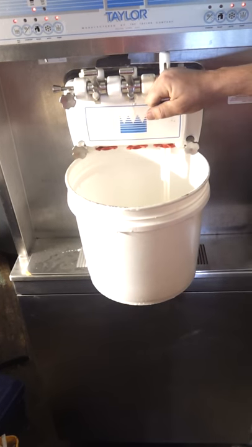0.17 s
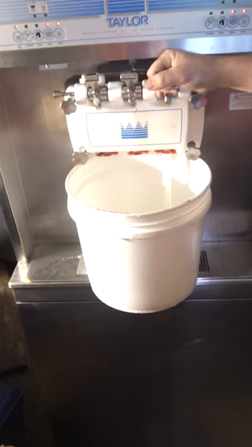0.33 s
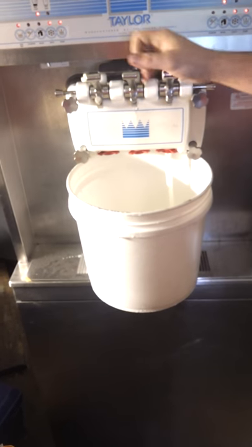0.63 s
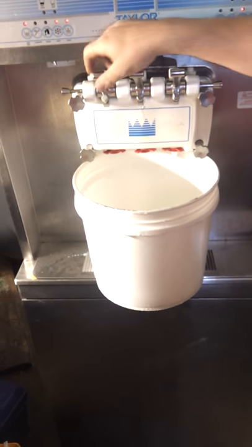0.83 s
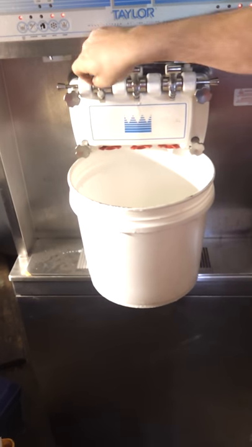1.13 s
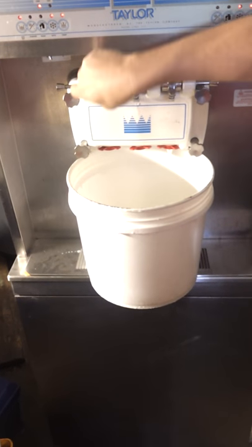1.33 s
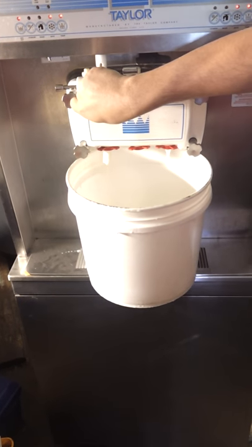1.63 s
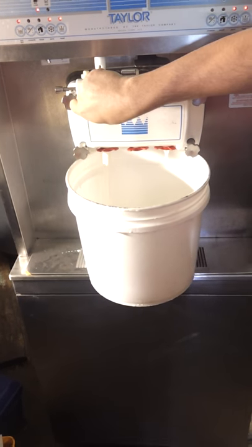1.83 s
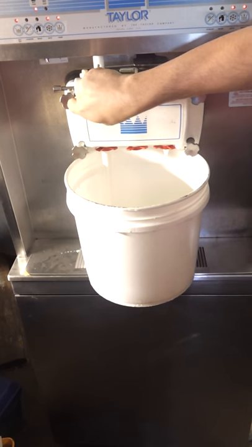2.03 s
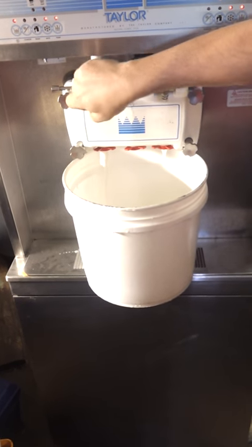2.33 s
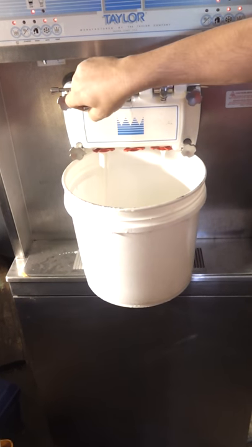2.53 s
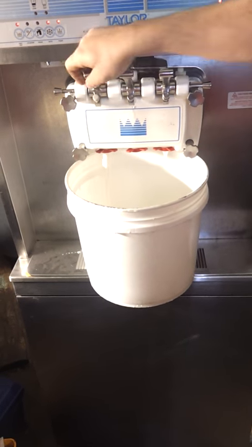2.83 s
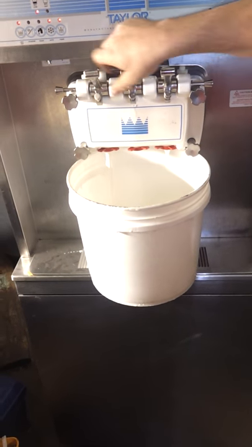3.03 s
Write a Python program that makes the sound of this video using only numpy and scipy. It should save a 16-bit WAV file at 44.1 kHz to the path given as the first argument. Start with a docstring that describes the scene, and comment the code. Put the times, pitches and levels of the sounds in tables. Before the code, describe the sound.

Soft-serve machine motor drone and fan roar, with sharp handle clacks and low cabinet thuds

```python
"""Frozen-dessert machine in a kitchen

A frozen-dessert machine runs in a hard-walled kitchen while a hand works its draw handles over a pail.
Bands of noise make the fan rumble, roar and hiss; sine waves make the mains hum, the whine and the motor.
Narrow noise makes brief hisses, low fading sines make the cabinet booms, and random clicks
ringing through resonances make the handle clacks."""
import sys
import numpy as np
from scipy import signal
from scipy.io import wavfile

SR = 44100
rng = np.random.default_rng(int(sys.argv[2]) if len(sys.argv) > 2 else 0)


def put_to_file(sound):
    """Save the sound as 16-bit audio at rate SR, in the file named by the first command-line argument."""
    columns = np.atleast_2d(sound).T  # one column per channel
    safe = np.clip(columns, -1, 1)
    whole_steps = np.round(safe * 32767)
    wavfile.write(sys.argv[1], SR, whole_steps.astype(np.int16))


N = 140679

# loudness of the fan noise over time:
# (time [s], rumble [dB], roar [dB], hiss [dB], top hiss [dB])
FAN_LEVELS = [(0.0, -34, -19.5, -28, -36), (0.22, -28.5, -23, -29, -37), (0.35, -31, -19.5, -27, -37),
              (0.59, -30.5, -22, -27.5, -37), (1.04, -31, -22.5, -27.5, -33.5), (1.52, -29, -21, -27, -34),
              (1.71, -21, -19.5, -25.5, -31), (1.9, -28, -19, -27, -34), (2.18, -25, -20.5, -26.5, -33.5),
              (2.51, -27.5, -19.5, -25.5, -34), (2.82, -24.5, -17, -25.5, -34), (3.02, -28, -19, -25, -34),
              (3.19, -20, -19.5, -27, -33.5)]
# pitches that part rumble, roar, hiss and top hiss: (frequency [Hz])
FAN_SPLITS_HZ = [90, 800, 7500]
# tone colour of the fan noise inside each group: (frequency [Hz], relative density [dB per Hz])
FAN_SPECTRUM = [(14, -35), (24, -7.5), (65, -5), (87, -12), (114, -1.5), (148, -2.5), (170, -3), (194, 0.5),
                (290, -4.5), (314, -4.5), (400, -5.5), (567, -11.5), (631, -14), (684, -16.5), (968, -25.5),
                (1140, -20), (1230, -23), (1570, -24.5), (2220, -29), (2410, -30), (7030, -31.5),
                (11100, -40.5), (14500, -48)]
FAN_PATCHY_DB = [0.86, 0.96, 0.82, 0.34]  # flicker of rumble, roar, hiss, top hiss

# level of the mains hum: (time [s], level [dB rms])
HUM_LEVELS = [(0.0, -29), (0.5, -43), (0.64, -26), (1.04, -41), (1.3, -26), (1.34, -35.5), (1.74, -31),
              (1.82, -18), (1.88, -26), (1.95, -18), (2.02, -35), (2.25, -27.5), (2.38, -32), (2.46, -17),
              (2.53, -31.5), (2.64, -23), (2.69, -52), (2.92, -21.5), (3.03, -39), (3.14, -19), (3.19, -29)]
HUM_HZ = 120
# pulses of the rough whine: (time [s], level [dB rms])
WHINE_LEVELS = [(0.0, -60), (.23, -56), (.26, -36), (.29, -41), (.32, -36), (.36, -43), (.42, -34),
                (.48, -42), (.53, -39), (.62, -43), (.71, -39), (.85, -42), (1.4, -44), (1.7, -47),
                (2.6, -46), (2.9, -42), (3.19, -43)]
WHINE_HZ, WHINE_LATER_HZ, WHINE_JITTER_HZ = 2225, 2185, 18
WHINE_DROP_S = 0.8

# multiples of the motor's shaft speed: (multiple, level [dB rms])
SHAFT_ORDERS = [(2, -37), (6, -30.5), (8, -37), (9, -29), (10, -26), (11, -33), (12, -35), (14, -34),
                (16, -36), (19, -40.5), (26, -43.5), (34, -39.5), (43, -47.5), (44, -39.5)]
SHAFT_HZ, SHAFT_WOBBLE = 28.43, 0.0006  # wobble is a fraction of the speed
ORDER_SCATTER = 0.3  # spread of the starting phases [cycles]
# pitches of the other steady tones: (frequency [Hz])
STEADY_TONES_HZ = [414, 646, 1890, 5432, 5491, 6860, 7690]
# their levels, in the same order:
# (level at first [dB rms], level after the second handle is drawn [dB rms], waver [dB])
STEADY_TONE_LEVELS = [(-32, -32, 1.5), (-37, -37, 4), (-46, -44, 3), (-46, -54, 1.0), (-43, -47, .5),
                      (-56, -45, 2), (-49, -55, 2)]
MOTOR_START_S, MOTOR_RISE_S, ORDER_WAVER_DB = 0.122, 0.044, 1
SECOND_DRAW_S, CHANGE_S = 1.45, 0.22  # CHANGE_S also times the whine's drop

# brief narrow hisses: (time [s], length [s], frequency [Hz], width [Hz], level [dB])
HISSES = [(.71, .04, 6600, 600, -35), (0.827, 0.045, 2630, 40, -36.5), (1.945, 0.088, 7000, 600, -32),
          (2.576, .04, 7340, 500, -33), (2.9, 0.13, 6500, 700, -34)]

# low booms of the cabinet: (time [s], frequency [Hz], level [dB], time to fade by 60 dB [s])
CABINET_BOOMS = [(1.544, 32, -10.5, 0.78), (1.55, 65.7, -5.5, 0.434), (2.081, 33.2, -25, .5),
                 (2.341, 60, -25, 0.53), (2.811, 46.6, -8.5, 0.3), (2.864, 63, -17, 0.61),
                 (3.101, 51.3, -18.5, 0.39)]
BOOM_RISE_S = 0.031

# handle clacks: (time [s], rise [s], time to fade by 60 dB [s], left over right [dB],
# body [dB], mid [dB], presence [dB], treble [dB],
# first ring [Hz], width [Hz], level [dB], second ring [Hz], width [Hz], level [dB])
HANDLE_CLACKS = [(0.0, 0.00059, 0.28, 1.5, -40, -24, -16.5, -15, 12500, 1500, -16, 11040, 900, -19),
                 (0.002, 0.0033, 0.7, -1.2, -46, -36, -41, -39, 6460, 1480, -14.5, 2430, 130, -19.5),
                 (0.024, .002, 0.26, 0, -48, -46, -32, -40, 11200, 1200, -29, 2460, 130, -29),
                 (1.252, 0.0018, 0.23, 1, -45, -29.5, -25, -30, 577, 40, -16, 6100, 700, -29),
                 (1.4986, 0.0014, 0.37, 1.5, -17.5, -19, -16.5, -19.5, 1570, 300, -27, 7950, 400, -20),
                 (1.5, .002, 0.21, -3.5, -40, -31, -33, -30, 3840, 300, -30, 9100, 800, -14.5),
                 (1.51, .001, .15, 0, -46, -46, -33, -33, 5370, 400, -24, 9030, 500, -15),
                 (1.556, 0.0027, 0.33, 0, -43, -29.5, -28.5, -48, 3830, 300, -36, 9030, 800, -21),
                 (1.503, 0.0051, 0.61, 1.5, -12, -42, -33, -45, 557, 58.7, -18.5, 239, 50, -24),
                 (1.601, 0.01, 0.69, 1.5, -23.5, -30, -35, -32, 194, 39.6, -13.5, 4900, 600, -46),
                 (1.745, 0.006, 0.066, 1, -48, -36, -27.5, -31, 382, 60, -21, 7000, 900, -43.5),
                 (2.333, 0.002, 0.25, 4, -35, -27, -23.5, -34, 5040, 800, -25, 6400, 1200, -22),
                 (2.345, 0.017, 0.32, 2, -38, -25, -22, -12.5, 2440, 150, -36, 9200, 500, -22),
                 (2.3432, 0.001, 0.34, -0.5, -43, -34, -21.5, -18.5, 11800, 900, -25, 10300, 500, -22),
                 (2.379, .001, 0.18, 0, -40, -41, -36, -25, 11600, 700, -30, 5200, 300, -34),
                 (2.775, 0.014, 0.73, 3, -25, -31, -27, -33.5, 630, 80, -23, 5560, 900, -33),
                 (2.83, 0.015, 0.35, -1, -13, -20, -26.5, -55, 730, 159, -16.5, 2020, 400, -28)]
# bands for body, mid, presence and treble: (low edge [Hz], high edge [Hz])
CLACK_BANDS_HZ = [(140, 496), (700, 2600), (2500, 5940), (8000, 13700)]
# resonances of handles and door: (frequency [Hz], width [Hz], level [dB])
HANDLE_RESONANCES = [(248, 86, 3.5), (509.5, 22, 8), (1500, 400, 5), (2437, 120, 3), (4870, 530, -5),
                     (6500, 260, -3.5), (8600, 110, -3), (10700, 700, -3)]
RATTLE_PER_S, RATTLE_SPREAD_DB = 9000, 0.5
CLUMP_DB, CLUMP_HZ = 1, 93  # uneven strength of neighbouring contacts
RING_FADE = 1.88  # rings die this many times faster than the rattle

# how alike left and right are: (frequency [Hz], likeness [-1 to 1])
EAR_LIKENESS = [(60, 0.93), (130, 0.94), (290, 0.99), (620, 0.35), (1360, -0.23), (2970, -0.22),
                (6490, 0.056), (14200, -0.2)]
# balance of the two sides: (frequency [Hz], left over right [dB])
EAR_BALANCE = [(60, -1), (110, 0), (200, -0.5), (370, 2), (680, 0), (1250, 1.5), (2290, 0.5), (4210, 1),
               (7720, 4.5), (14200, -13.5)]
MIC_STEP_HZ, MIC_STEP_DB, CUTOFF_HZ = 11950, -12, 14750


def from_db(db):
    """Turn decibels into a gain, the number that multiplies a wave."""
    return 10 ** (np.asarray(db) / 20)


def rms_one(x):
    """Scale a sound so that its average strength (rms) is 1."""
    return x / np.sqrt(np.mean(x ** 2) + 1e-20)


def at_hz(points, hz):
    """Read a table between its rows, with pitch on a log scale as the ear hears it."""
    table = np.array(points)
    return np.interp(np.log(hz), np.log(table[:, 0]), table[:, 1])


def drift(rate_hz):
    """Slow random wandering of spread 1: noise smoothed so that little above the rate is left."""
    step = 40  # worked out at every 40th sample, then joined by straight lines
    r = np.exp(-2 * np.pi * step * rate_hz / SR)
    noise = rng.standard_normal(N // step + 2002)
    slow = signal.lfilter([1], [1, -2 * r, r * r], noise)[2000:]  # skip the filter's settling
    return np.interp(np.arange(N) / step, np.arange(len(slow)), rms_one(slow - slow.mean()))


def band(x, low_hz, high_hz):
    """Keep mainly the pitches between two edges."""
    edges = [low_hz, min(high_hz, 0.45 * SR)]
    return signal.sosfilt(signal.butter(2, edges, "band", fs=SR, output="sos"), x)


def resonance(x, hz, width_hz):
    """Ring like a struck object: a two-pole filter with gain 1 at its peak."""
    r = np.exp(-np.pi * width_hz / SR)
    feed = np.array([1, 0, -1]) * (1 - r * r) / 2
    feedback = [1, -2 * r * np.cos(2 * np.pi * hz / SR), r * r]
    return signal.lfilter(feed, feedback, x)


def stereo(mid, side, hz):
    """Mix a shared and an opposed signal into left and right as the microphone pair hears that pitch."""
    alike = np.clip(at_hz(EAR_LIKENESS, hz), -1, 1)
    left_db = at_hz(EAR_BALANCE, hz) / 2
    shared = np.sqrt(1 + alike) * mid
    opposed = np.sqrt(1 - alike) * side * [[1], [-1]]
    return (shared + opposed) * from_db([[left_db], [-left_db]]) / np.sqrt(2)


def strike(start, rise, t60):
    """Loudness of a blow: a straight rise, then a steady fall in decibels."""
    t = np.arange(N) / SR - start
    attack = np.clip(t / max(rise, 1e-4), 0, 1)
    return attack * from_db(-60 * np.clip(t - rise, 0, 2) / t60)


def fans():
    """Rushing air as third-octave noise in four groups, from rumble to top hiss, each flickering."""
    times, *levels_db = np.transpose(FAN_LEVELS)
    groups = np.zeros((4, 2, N))
    edges = 24 * 2 ** np.arange(0, 9.4, 1 / 3)
    settle = SR // 2  # filter start-up, thrown away
    white = rng.standard_normal((2, 2, N + settle))
    together = drift(3.0)
    for k, (low, high) in enumerate(zip(edges, edges[1:])):
        mid, side = band(white[k % 2], low, high)[:, settle:]  # neighbours use different noise
        hz = np.sqrt(low * high)
        group = np.searchsorted(FAN_SPLITS_HZ, hz)
        flicker_db = FAN_PATCHY_DB[group] * (0.23 * together + drift(6.0))
        groups[group] += from_db(at_hz(FAN_SPECTRUM, hz) + flicker_db) * stereo(mid, side, hz)
    t, out = np.arange(N) / SR, 0
    for level_db, noise in zip(levels_db, groups):
        out = out + from_db(np.interp(t, times, level_db)) * rms_one(noise)
    return out


def mains_hum():
    """A mains hum: one steady sine that swells and sinks."""
    t = np.arange(N) / SR
    phase = 2 * np.pi * (HUM_HZ * t + rng.random())
    level = from_db(np.interp(t, *np.transpose(HUM_LEVELS)))
    return np.sqrt(2) * level * stereo(np.sin(phase), np.cos(phase), HUM_HZ)


def whine():
    """A sine made rough by quick jitter in pitch and level; it pulses and settles a little lower."""
    t = np.arange(N) / SR
    dropped = np.clip((t - WHINE_DROP_S) / CHANGE_S, 0, 1)
    hz = WHINE_HZ + dropped * (WHINE_LATER_HZ - WHINE_HZ) + WHINE_JITTER_HZ * drift(25)
    phase = 2 * np.pi * np.cumsum(hz) / SR
    rough = stereo(np.sin(phase), np.cos(phase), WHINE_HZ) * from_db(1.5 * drift(30))
    return from_db(np.interp(t, *np.transpose(WHINE_LEVELS))) * rms_one(rough)


def motor():
    """Shaft multiples and steady tones as wavering sines; high ones reach the two ears out of step."""
    t, out = np.arange(N) / SR, 0
    wobbly_time = np.cumsum(1 + SHAFT_WOBBLE * drift(2.35)) / SR  # all pitches wobble together
    running = np.clip((t - MOTOR_START_S) / MOTOR_RISE_S, 0, 1)
    changed = np.clip((t - SECOND_DRAW_S) / CHANGE_S, 0, 1)
    lines = [(k * SHAFT_HZ, ORDER_SCATTER, db, db, ORDER_WAVER_DB) for k, db in SHAFT_ORDERS]
    lines += [(hz, 1, *row) for hz, row in zip(STEADY_TONES_HZ, STEADY_TONE_LEVELS)]
    for hz, scatter, first_db, later_db, waver_db in lines:
        phase = 2 * np.pi * (hz * wobbly_time + scatter * rng.standard_normal())
        level_db = first_db + (later_db - first_db) * changed + waver_db * drift(9.6)
        out = out + np.sqrt(2) * from_db(level_db) * stereo(np.sin(phase), np.cos(phase), hz)
    return out * running


def narrow_hisses():
    """Short hisses: noise through a resonance twice, swelling and fading, separate in each ear."""
    t, out = np.arange(N) / SR, 0
    white = rng.standard_normal((2, N))
    for start, length, hz, width, db in HISSES:
        narrow = rms_one(resonance(resonance(white, hz, width), hz, width))
        swell = np.sin(np.pi * np.clip((t - start) / length, 0, 1))
        out = out + from_db(db) * narrow * swell
    return out


def booms():
    """The cabinet rocks and rings low: deep sines that rise quickly and die away."""
    t, out = np.arange(N) / SR, 0
    for start, hz, db, t60 in CABINET_BOOMS:
        wave = from_db(db) * strike(start, BOOM_RISE_S, t60) * np.sin(2 * np.pi * hz * (t - start))
        out = out + stereo(wave, -wave, hz)  # leans to the right
    return out


def handle_rattle():
    """Handle parts touch in many tiny contacts: clicks at random moments, of uneven size and sign."""
    size_db = RATTLE_SPREAD_DB * np.minimum(rng.exponential(1, (2, N)), 5)
    clicks = from_db(size_db) * rng.choice([-1, 1], (2, N))
    touching = rng.random((2, N)) < RATTLE_PER_S / SR
    return clicks * touching * from_db(CLUMP_DB * drift(CLUMP_HZ))


def clacks():
    """Each clack is a dense rattle coloured by handle resonances, with two rings, dying in the room."""
    rattle = handle_rattle()
    coloured = rattle
    for hz, width, db in HANDLE_RESONANCES:
        coloured = coloured + from_db(db) * resonance(rattle, hz, width)
    envelopes, out = [], 0
    for row in HANDLE_CLACKS:
        start, rise, t60, left_db = row[:4]
        envelopes.append(strike(start, rise, t60) * from_db([[left_db / 2], [-left_db / 2]]))
    for k, (low, high) in enumerate(CLACK_BANDS_HZ):
        mid, side = rms_one(band(band(coloured, low, high), low / 2, high * 2))
        level = sum(from_db(row[4 + k]) * e for row, e in zip(HANDLE_CLACKS, envelopes))
        out = out + level * stereo(mid, side, np.sqrt(low * high))
    for row, envelope in zip(HANDLE_CLACKS, envelopes):
        for hz, width, db in (row[8:11], row[11:14]):  # the two strongest rings
            mid, side = rms_one(resonance(resonance(rattle, hz, width), hz, width))
            out = out + from_db(db) * envelope ** RING_FADE * stereo(mid, side, hz)
    return out


def scene():
    """Add all the sources, from the background to the handles."""
    return fans() + mains_hum() + whine() + motor() + narrow_hisses() + booms() + clacks()


def record(dry):
    """Cut the deepest bass, step the highest treble down, clip the peaks, then cut the very top."""
    x = signal.sosfilt(signal.butter(4, 22, "high", fs=SR, output="sos"), dry)
    below = signal.sosfiltfilt(signal.butter(12, MIC_STEP_HZ, fs=SR, output="sos"), x)
    stepped = below + from_db(MIC_STEP_DB) * (x - below)
    clipped = np.clip(stepped, -0.97, 0.97)
    return signal.sosfilt(signal.ellip(12, 0.5, 80, CUTOFF_HZ, fs=SR, output="sos"), clipped)


dry = scene()
out = record(dry)
put_to_file(out)
```